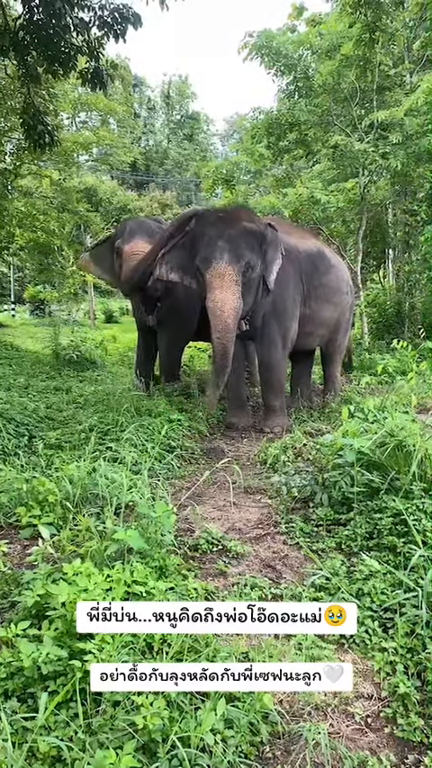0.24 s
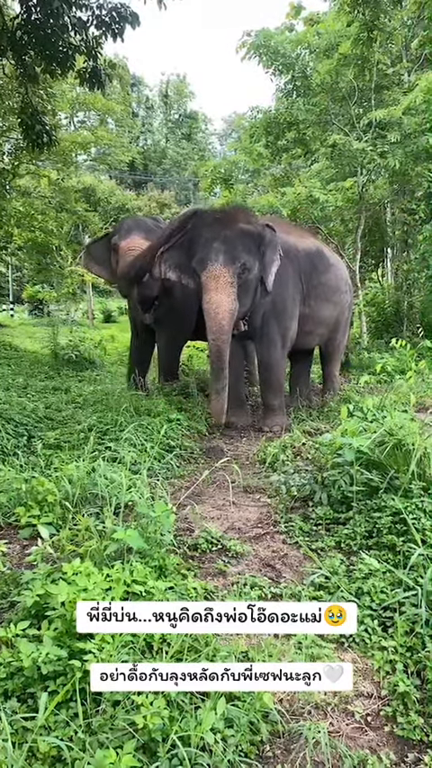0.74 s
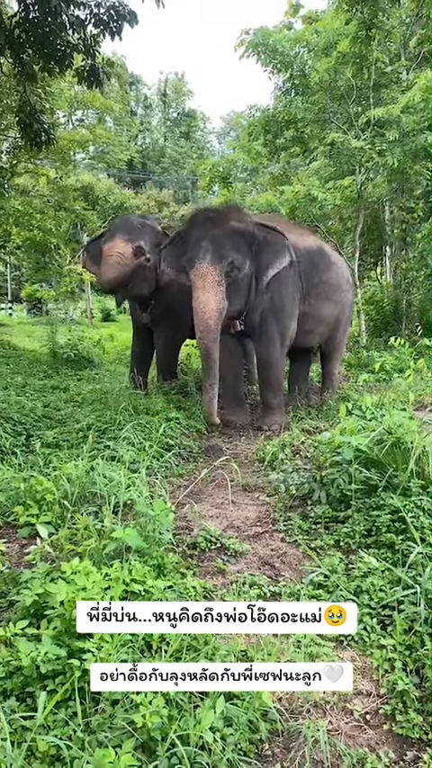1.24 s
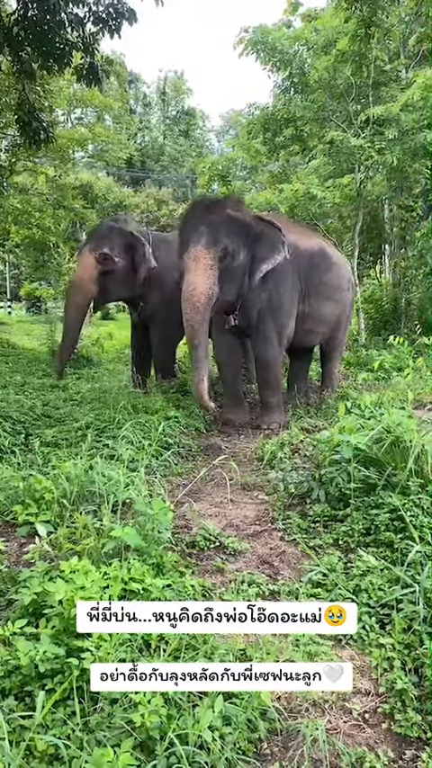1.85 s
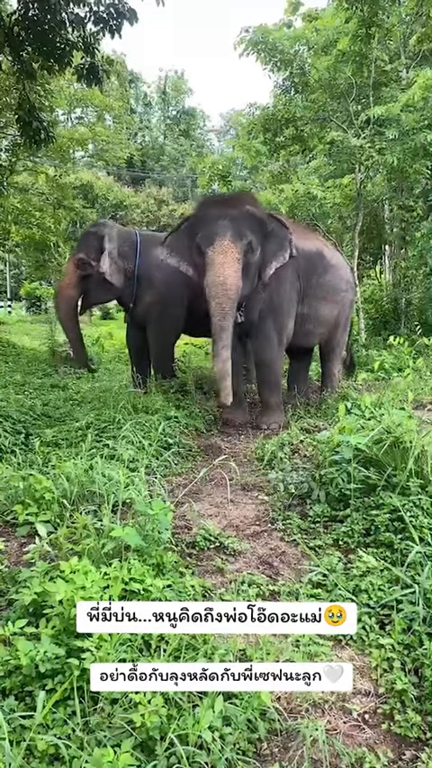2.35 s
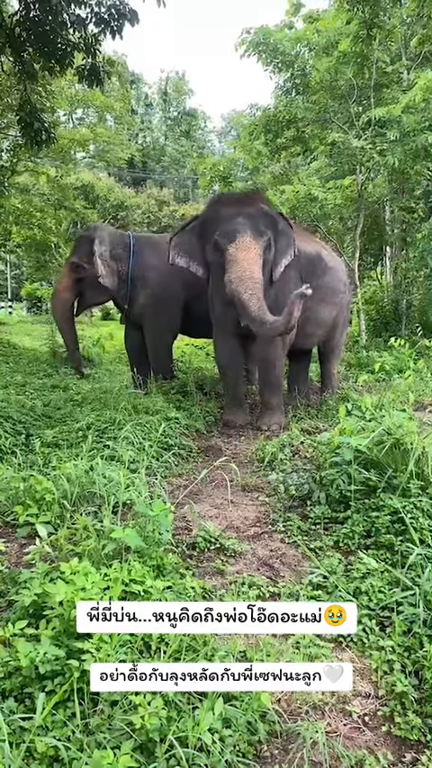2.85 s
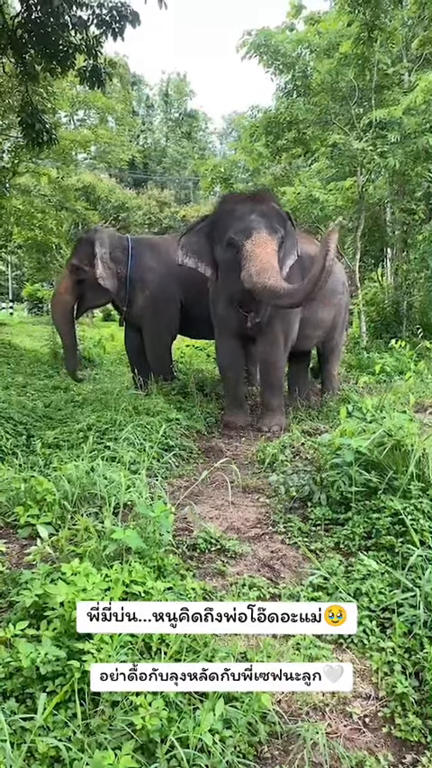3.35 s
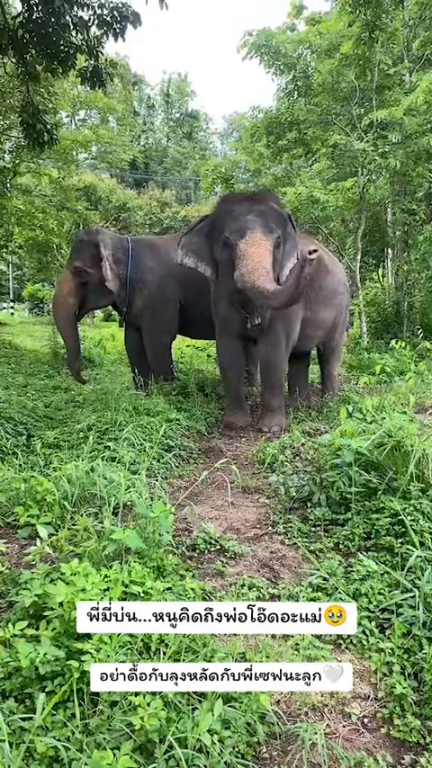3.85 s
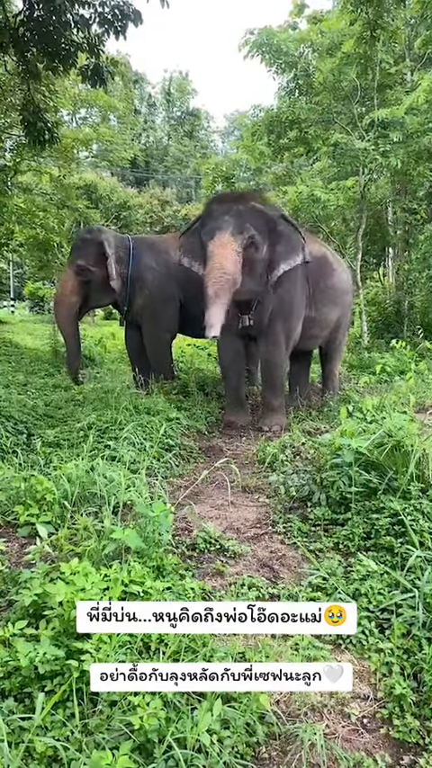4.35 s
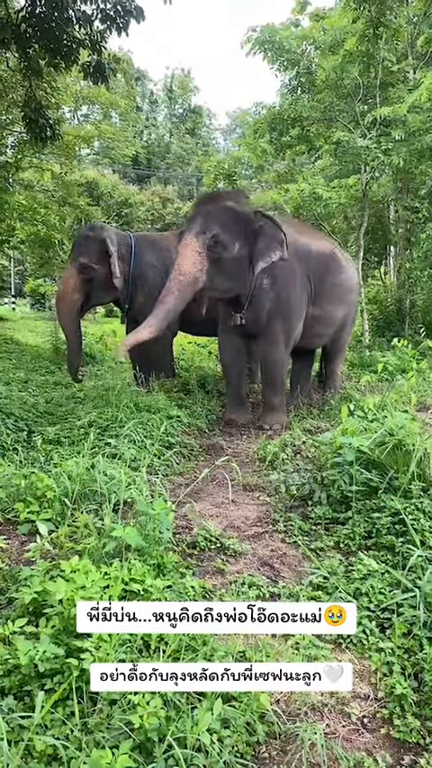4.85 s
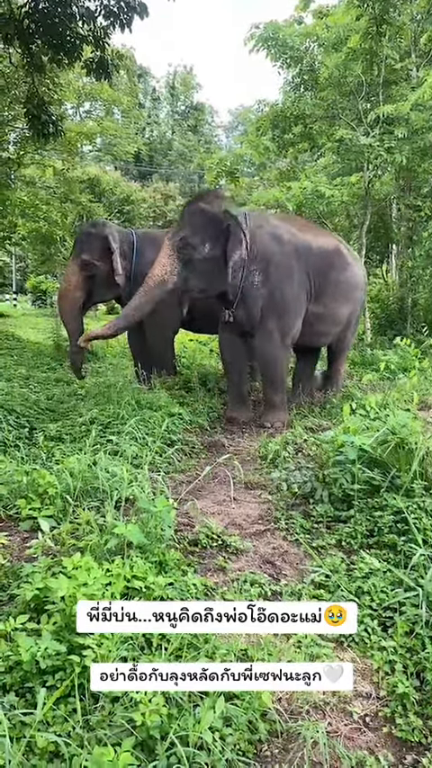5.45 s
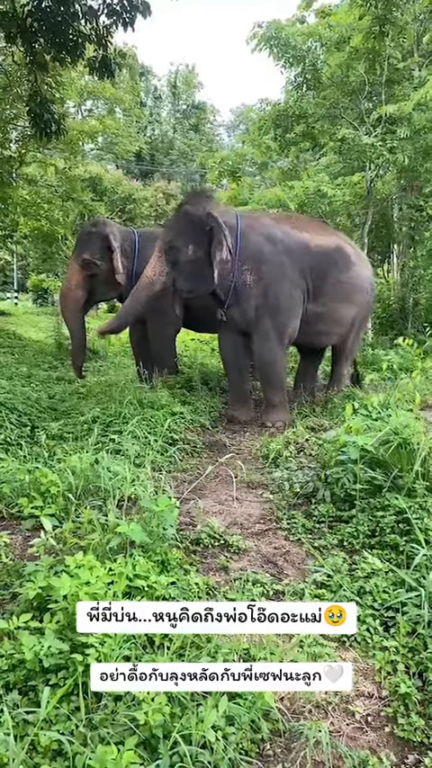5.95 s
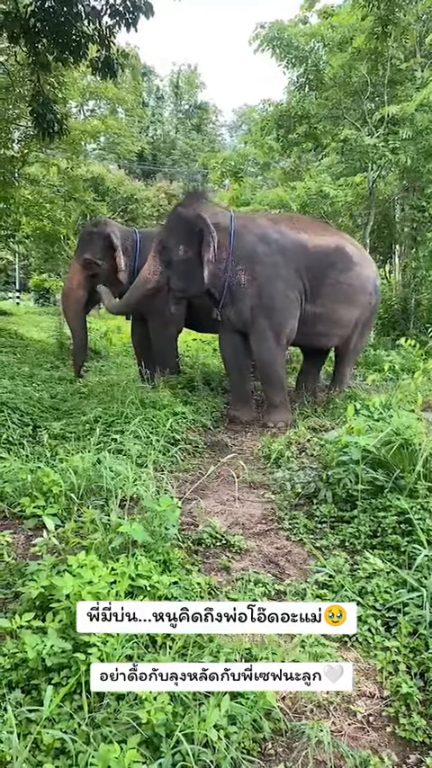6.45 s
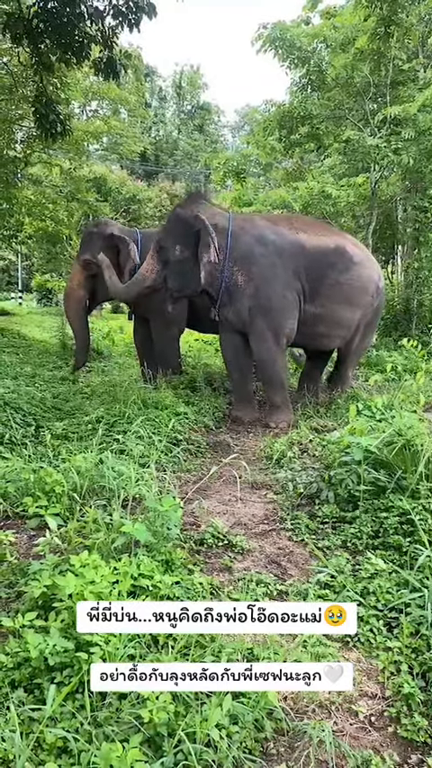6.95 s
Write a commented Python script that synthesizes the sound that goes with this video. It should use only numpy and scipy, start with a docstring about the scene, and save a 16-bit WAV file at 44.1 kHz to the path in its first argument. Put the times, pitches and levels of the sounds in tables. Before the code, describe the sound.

The sound opens in the middle of an elephant's deep rumble, about 24 throat pulses per second, booming near 100 Hz with a faint breathy rasp. It holds steady, easing slightly around 0.9 s, then weakens from 1.2 s, its last pulses slowing until it stops at 1.4 s. A soft, low, fluttering blow of air peaks near 1.55 s and fades. Leaves scrape and twigs crack between 0.4 and 0.9 s, with a thuddy snap at 0.6. A woody, ringing snap comes at 1.9, smaller ones at 2.5 and 6.1, with barely audible foot scuffs at 2.6 and 6.1. Birds chirp sparsely; a harsh, quick warble stands out at 4.0-4.7, an upward flick at 5.0, then faint even pips from 5.4, falling chirps, and flicks at 6.6 and 7.05. A steady high hiss, airy foliage and faint distant engine drone last throughout, with gentle tree echo.

```python
"""Elephant rumble in a forest clearing

An elephant ends a deep, steady rumble (slaps ringing a throat) and blows out its remaining air (noise).
Undergrowth rustles (grainy noise), feet shift (low noise), twigs snap (bursts and decaying sines).
Birds warble and chirp in the trees, among thin faint tones (gliding or held sines).
A high hiss (banded noise) lies all around, over the low drone of a far engine (wavering sines and noise)."""
import sys
import numpy as np
from scipy import signal
from scipy.fft import rfft, irfft, next_fast_len
from scipy.io import wavfile
from scipy.ndimage import uniform_filter1d, map_coordinates

SR = 44100
rng = np.random.default_rng(int(sys.argv[2]) if len(sys.argv) > 2 else 0)


def to_wav(s):
    """Save 16-bit WAV."""
    ch = np.atleast_2d(s).T  # columns
    pcm = np.round(np.clip(ch, -1, 1) * 32767)  # PCM
    wavfile.write(sys.argv[1], SR, pcm.astype(np.int16))


N = 317520

# end of the call; start and speed of its release
STOP_AT_S, RELEASE_AT_S, RELEASE_DB_PER_S = 1.39, 1.174, 69


def amp(db):
    """Decibels to gain."""
    return 10 ** (np.asarray(db) / 20)


def unit(x):
    """Scaled to rms 1."""
    return x / np.sqrt(np.mean(x ** 2) + 1e-20)


def along(points, hz):
    """(Hz, value) points interpolated on a log frequency axis."""
    f, v = np.transpose(points)
    return np.interp(np.log(hz + 1), np.log(f + 1), v)


def wobble(knots_per_s):
    """A smooth random curve through normally distributed knots."""
    knots = rng.standard_normal(size=4096)
    at = np.arange(0, N, 16)
    return np.interp(np.arange(N), at, map_coordinates(knots, [at * knots_per_s / SR], mode="wrap"))


def filtered(x, response):
    """x times a complex response of frequency."""
    m = next_fast_len(N + SR // 2)
    return irfft(rfft(x, m) * response(np.fft.rfftfreq(m, 1 / SR)), m)[..., :N]


def resonance(f, hz, width_hz):
    """Response of one damped resonance."""
    return 1j * f * width_hz / (hz * hz - f * f + 1j * f * width_hz)


def add(track, start_s, sound):
    """Mix a sound in at its start time."""
    part = track[max(0, round(start_s * SR)):][:len(sound)]
    part += sound[:len(part)]


def sine(hz, t, phase=0):
    """A sine of rms 1."""
    return np.sqrt(2) * np.sin(2 * np.pi * hz * t + phase)


def swell(peak_s, rise_s, fall_s):
    """Gain that grows exponentially to 1 at its peak and dies away again."""
    t = np.arange(N) / SR - peak_s
    return np.exp(np.minimum(t / rise_s, -t / fall_s))


def bump(peak_s, half_width_s):
    """A smooth hump of height 1."""
    return np.exp(-((np.arange(N) / SR - peak_s) / half_width_s) ** 2)


def rush(spectrum, patchy_db):
    """Diffuse stereo noise of rms 1 with patches of random gain over time and frequency."""
    # pitch_hz, left_right_likeness
    likeness = [(60, 1), (120, 1), (220, 0.88), (430, 0.036), (820, -0.18), (1580, 0.7), (3040, 0.65),
                (5860, 0.82), (11300, 0.39)]
    z = signal.stft(rng.standard_normal((2, N)), nperseg=512)[2]
    patches = uniform_filter1d(rng.standard_normal(z.shape[1:]), size=5, axis=0)
    patches = uniform_filter1d(patches, size=16, axis=1)
    pair = signal.istft(z * amp(patchy_db * unit(patches)), nperseg=512)[1][:, :N]

    def mid_side(hz):
        angle = np.arccos(np.clip(along(likeness, hz), -1, 1)) / 2
        return amp(along(spectrum, hz)) * [np.cos(angle), np.sin(angle)]

    mid, side = filtered(pair, mid_side)
    return unit(np.array([mid + side, mid - side]))


def ringing(spectrum):
    """Causal impulse response of a body of this (Hz, dB) colour, minimum phase by cepstral folding."""
    cepstrum = irfft(np.log(amp(along(spectrum, np.fft.rfftfreq(SR, 1 / SR)))), SR)
    cepstrum[1:SR // 2] *= 2
    cepstrum[SR // 2 + 1:] = 0
    return irfft(np.exp(rfft(cepstrum)), SR)[:SR // 2]


def rasp(cycles, fleck_db):
    """A puff of air in every cycle rings the mouth, whose resonances bend with each puff and sink as it closes."""
    # pitch_hz, width_hz, level_db (relative), change_db_per_s
    mouth = [(300.3, 220, -3, -3.5), (561, 140, -3.5, -7), (763, 82, 1, -8), (1183, 34, -1.5, -7),
             (2650, 540, -8.5, -5)]
    rasp_db = -75.5
    puff_lead_cycles, puff_sharpness = .15, 1.25  # puffs come just before the slaps
    sag_per_s2, bend = .06, .04  # shares of the resonance pitch
    t = np.arange(N) / SR
    turn = 2 * np.pi * (cycles + puff_lead_cycles)
    puffs = np.exp(puff_sharpness * np.cos(turn))
    bent_s = np.cumsum(1 - sag_per_s2 * t ** 2 + bend * np.sin(turn)) / SR
    out = np.zeros(N)
    for hz, width_hz, db, db_per_s in mouth:
        air = puffs * (rng.standard_normal(N) + 1j * rng.standard_normal(N))
        ring = signal.sosfilt(signal.butter(2, width_hz / 2, fs=SR, output="sos"), air)
        tone = unit(np.real(ring * np.exp(2j * np.pi * hz * bent_s)))
        out += tone * amp(db + db_per_s * t + fleck_db * wobble(24.2))
    return amp(rasp_db) * out * np.clip((STOP_AT_S - t) / .02, 0, 1)


def rumble(first_slap_s, scatter_db, jitter_s):
    """Vocal folds slap shut and each slap booms in the throat; the last slaps come later and weaker."""
    # slap rate, sagging as the air runs out: time_s, pitch_hz
    pitch = [(0, 24.5), (.25, 24.2), (.85, 24.35), (1.0, 24.65), (1.21, 24.6), (1.29, 22.5), (1.33, 17),
             (1.4, 16)]
    # colour of the throat: pitch_hz, level_db (relative)
    throat = [(12, -72.5), (24, -38), (49, -13.5), (73, -14), (88, -9), (97.5, 1), (107, -0.5),
              (122, -12.5), (146, -28), (171, -19.5), (195, -29), (222, -41.5), (260, -54), (500, -83)]
    rumble_db = -42  # rms of the first second, before the easing
    ease_at_s, ease_db, ease_half_width_s = 0.86, -1.5, 0.15  # effort eases before the last push
    slack_db_per_s, slack_hold_s = 700, .018  # extra damping at full slackness, delay after a slap
    t = np.arange(-SR // 2, N) / SR  # the call is already under way
    cycles = np.cumsum(np.interp(t, *np.transpose(pitch))) / SR
    cycles = cycles - np.interp(first_slap_s, t, cycles)
    slap_cycles = np.arange(np.ceil(cycles[0]), np.interp(STOP_AT_S, t, cycles))
    times = np.interp(slap_cycles, cycles, t)
    slaps = np.zeros(len(t))
    for s, (late, hard) in zip(times, rng.standard_normal((len(times), 2))):
        slap_db = scatter_db * hard - RELEASE_DB_PER_S * max(s - RELEASE_AT_S, 0)
        add(slaps, s - t[0] + jitter_s * late, [amp(slap_db)])
    boom = signal.fftconvolve(slaps, ringing(throat))[:len(t)][-N:]
    # a slack throat stops ringing soon after each slap
    t = t[-N:]
    slack = np.clip((t - RELEASE_AT_S) / (STOP_AT_S - RELEASE_AT_S), 0, 1) ** 2
    since_s = t - times[np.searchsorted(times, t) - 1]
    damping = amp(-slack_db_per_s * slack * np.maximum(since_s - slack_hold_s, 0))
    boom = boom * uniform_filter1d(damping, size=300)
    effort = amp(rumble_db + ease_db * bump(ease_at_s, ease_half_width_s))
    return boom / np.std(boom[:SR]) * effort + rasp(cycles[-N:], fleck_db=2.0)


def engine(drone_db, waver_db, drift_rad, swell_db):
    """Far engine lines waver on their way through the forest, over a dull noise drone."""
    # engine lines: pitch_hz, level_db (relative)
    hum = [(29.8, -20), (45.5, -10.5), (59.5, 0.5), (89.5, -11.5), (119, -17.5), (130, -7.5),
           (135.5, -11.5)]
    # drone colour: pitch_hz, level_db (relative)
    drone = [(15, -35), (28, -13.5), (36, -16), (47, 0), (62, 2), (80, -2), (102, -4.5), (135, -0.5),
             (165, -13), (220, -16.5), (330, -34), (600, -56.5)]
    engine_db = -68.5
    t = np.arange(N) / SR
    lines = sum(amp(db + waver_db * wobble(3.7)) * sine(hz, t, drift_rad * wobble(3.012)) for hz, db in hum)
    return amp(engine_db + swell_db * wobble(2.52)) * (lines + amp(drone_db) * rush(drone, patchy_db=0.0))


def forest(air_db, waver_db):
    """Soft noise of air in the foliage, and a nearly steady high hiss in two bands."""
    # air colour: pitch_hz, level_db (relative)
    air_colour = [(100, 7), (300, -2.5), (450, -3.5), (750, -1.5), (1100, 0), (1800, -4), (2400, -2),
                  (3200, -1.5), (3800, -7), (6000, -10), (11500, -51.5), (15500, -45)]
    # hiss colour: pitch_hz, level_db (relative)
    hiss_colour = [(3300, -21.5), (4500, 0), (5000, -2.5), (5450, 3), (5900, -7.5), (6300, -24.5),
                   (7400, -28.5), (8400, -7), (9900, -5), (10300, -9), (11200, -12.5), (12300, -26)]
    # hiss level changes: peak_s, change_db, half_width_s
    hiss_swells = [(3.75, 2.4, 0.36), (4.35, -0.1, 0.18)]
    hiss_db = -76
    air = amp(air_db) * rush(air_colour, patchy_db=1.8)
    level_db = hiss_db + sum(db * bump(s, half_width_s) for s, db, half_width_s in hiss_swells)
    return air + amp(level_db + waver_db * wobble(5.8)) * rush(hiss_colour, patchy_db=2.2)


def note(length_s, start_hz, middle_hz, end_hz, rough, taper=1, flutter_db=0):
    """One gliding or held tone of rms 1; fast random pitch shake makes it harsh."""
    shake_hz = 210 * rough
    u = np.linspace(0, 1, max(int(length_s * SR), 16))
    glide_hz = np.polyval(np.polyfit([0, .5, 1], [start_hz, middle_hz, end_hz], 2), u)
    shake = map_coordinates(rng.standard_normal(size=256), [u * length_s * 500], mode="wrap")
    flutter = map_coordinates(rng.standard_normal(size=64), [u * length_s * 50], mode="wrap")
    tone = np.sin(2 * np.pi * np.cumsum(glide_hz + shake_hz * shake) / SR)
    return unit(amp(flutter_db * flutter) * tone * np.abs(np.sin(np.pi * u)) ** taper)


def calls_and_tones(pip_hz, pip_length_s, count):
    """Five kinds of call or tone: gliding or held notes, and evenly spaced pips of one pitch."""
    # levels precede the mix gain in scene()
    # thin faint tones, mostly held; at 1.989 s a faint falling tone, the echo of the snap at 1.924 s:
    # start_s, length_s, pitch_hz, glide (share of pitch), level_db
    thin_tones = [(0.025, 0.078, 3410, 0, -75.5), (0.124, 0.063, 3405, 0, -81),
                  (0.199, 0.12, 2650, 0.0071, -78), (0.25, 0.087, 3260, -0.0083, -75),
                  (1.062, 0.057, 2380, 0.03, -77.5), (1.989, 0.11, 1647, -.08, -78),
                  (2.44, 0.074, 2645, 0, -73), (2.46, 0.089, 1570, 0, -82), (2.51, .23, 1409, 0.1, -78),
                  (5.094, .25, 1390, 0.1185, -79), (5.46, 0.18, 3160, 0, -87), (5.52, 0.23, 1696, .07, -83),
                  (5.72, 0.099, 998, -0.0044, -79), (6.8, 0.32, 3150, 0, -83.5)]
    # harsh warbler notes: start_s, length_s, middle_pitch_hz, glide (share of pitch), level_db
    warbles = [(1.431, 0.033, 2510, 0.072, -72), (1.452, 0.045, 2790, 0, -73),
               (2.27, 0.049, 2600, -0.0015, -75.5), (2.373, 0.058, 2710, -0.014, -69),
               (3.96, 0.044, 2750, 0.041, -70), (4.123, 0.059, 2225, 0.053, -69),
               (4.187, 0.019, 2920, -0.0018, -68), (4.314, 0.061, 2693, 0.12, -63),
               (4.363, .04, 2425, -0.068, -60), (4.496, .04, 1595, 0.027, -76.5),
               (4.537, 0.044, 2400, 0.0055, -64), (4.569, 0.034, 1956, -0.095, -72.5),
               (4.6, 0.076, 1737, 0.025, -76)]
    # falling chirps of one shape: start_s, start_pitch_hz, level_db
    chirps = [(1.886, 2780, -70.5), (2.35, 3770, -75), (2.63, 3570, -79), (3.724, 3470, -77),
              (5.225, 3500, -82), (5.3, 3300, -89), (5.765, 3350, -81), (5.96, 3200, -78),
              (6.215, 3520, -78), (6.309, 3520, -77), (6.673, 3500, -74)]
    # upward flicks to one top note: start_s, length_s, start_pitch_hz, level_db
    flicks = [(4.97, 0.027, 3860, -68), (6.612, 0.054, 3400, -69.5), (7.068, 0.072, 3970, -70)]
    warble_arch, warble_rough_per_khz = 0.039, 0.18  # arch as a share of pitch
    flick_top_hz, flick_bend = 4870, 0.27  # share of the climb done at half time
    chirp_s, chirp_fall = 0.07, 0.27  # fall as a share of pitch
    pips_from_s, pip_period_s = 5.375, 0.222  # a far bird's even pace
    pip_db, pip_growth_db, pip_scatter_db = -77, 0.5, 1.3  # growth per pip
    out = np.zeros(N)
    for s, length_s, hz, glide, db in warbles:
        ends_hz, step_hz = hz * (1 - warble_arch), hz * glide / 2
        rough = warble_rough_per_khz * hz / 10 ** 3
        add(out, s, amp(db) * note(length_s, ends_hz - step_hz, hz, ends_hz + step_hz, rough))
    for s, length_s, hz, db in flicks:
        middle_hz = hz + flick_bend * (flick_top_hz - hz)
        add(out, s, amp(db) * note(length_s, hz, middle_hz, flick_top_hz, rough=0.15))
    for s, hz, db in chirps:
        middle_hz, end_hz = hz * (1 - chirp_fall / 2), hz * (1 - chirp_fall)
        add(out, s, amp(db) * note(chirp_s, hz, middle_hz, end_hz, rough=0.76))
    for s, length_s, hz, glide, db in thin_tones:
        step_hz = hz * glide / 2
        tone = note(length_s, hz - step_hz, hz, hz + step_hz, rough=0.17, taper=.5, flutter_db=4)
        add(out, s, amp(db) * tone)
    for k in range(count):
        db = pip_db + k * pip_growth_db + pip_scatter_db * rng.standard_normal()
        pip = note(pip_length_s, pip_hz, pip_hz, pip_hz, rough=0.27)
        add(out, pips_from_s + k * pip_period_s, amp(db) * pip)
    return out


def far_birds(chatter_db, pitch_hz, sweep, count):
    """Many faint chirps at random times, sweeping up or down, from deep in the trees."""
    out = np.zeros(N)
    for when, length, pitch, slope, size in rng.random((count, 5)):
        hz = pitch_hz * (.75 + .5 * pitch)
        step_hz = hz * sweep * (2 * slope - 1)
        chirp = note(.04 + 0.063 * length, hz + step_hz, hz, hz - step_hz, rough=.45)
        add(out, when * N / SR, amp(chatter_db - 2.2 * size) * chirp)
    return out


def undergrowth(grain_db, crackles_per_s, crackle_db, stalk_db):
    """Leaves scrape and crackle, coloured by the stalks each swish bends; dry blades brush and sizzle."""
    # trampled swishes: peak_s, level_db, rise_s, stalk_resonance_hz
    swishes = [(.38, -68, 0.2, 1020), (.495, -69, 0.024, 2680), (.54, -76, 0.016, 900),
               (.61, -67, 0.0075, 700), (.645, -72.5, 0.0087, 2720), (.78, -73.5, 0.011, 1300),
               (.83, -69.5, 0.024, 1430)]
    # leaf colour: pitch_hz, level_db (relative)
    leaf_colour = [(150, -16), (350, 4), (900, 2.5), (1400, 0.5), (2000, -1), (2700, -1), (4000, -4.5),
                   (5700, -6.5), (7300, -36), (9500, -12), (15000, -33)]
    # dry grass brushes: peak_s, level_db, half_width_s
    sizzles = [(.487, -75.5, .03), (1.09, -80, 0.033)]
    # dry grass colour: pitch_hz, level_db (relative)
    blade_colour = [(2000, -22), (5000, 1), (9500, -4), (12000, 5), (15500, -12)]
    fall_per_rise = 2.44  # ratio of time constants

    def scraping(spectrum):
        return unit(rush(spectrum, patchy_db=2.0) * amp(grain_db * wobble(300)))

    ticks = (rng.random(N) < crackles_per_s / SR) * rng.standard_normal(N)
    crackle = unit(filtered(ticks, lambda f: amp(along(leaf_colour, f))))
    leaves = scraping(leaf_colour) + amp(crackle_db) * crackle
    out = scraping(blade_colour) * sum(amp(db) * bump(s, half_width_s) for s, db, half_width_s in sizzles)
    for s, db, rise_s, hz in swishes:
        coloured = filtered(leaves, lambda f: 1 + amp(stalk_db) * resonance(f, hz, 0.25 * hz))
        out += amp(db) * unit(coloured) * swell(s, rise_s, fall_per_rise * rise_s)
    return out


def twigs(crack_db, crack_t60_s, thud_t60_s, thud_rise_s):
    """Each snap is a broad noise crack and a short ring of the wood, over a thud of the ground."""
    # start_s, level_db, ring_hz, ring_t60_s, crack_hz, thud_db (relative)
    snaps = [(.495, -65, 5170, .015, 5500, -24), (0.509, -64, 2600, .05, 2600, -20),
             (0.532, -67, 3000, .012, 4000, -20), (0.557, -75, 1290, .012, 1500, -10),
             (.613, -60.5, 2750, 0.018, 3200, 15.5), (1.924, -62, 1707, 0.08, 1460, -12),
             (2.467, -66, 2900, .015, 3100, -25), (6.124, -68, 1350, 0.017, 1000, -2)]
    thud_hz = 270
    out, t = np.zeros(N), np.arange(SR // 5) / SR
    f = np.fft.rfftfreq(len(t), 1 / SR)
    for s, db, hz, t60_s, crack_hz, thud_db in snaps:
        crack_response = resonance(f, crack_hz, 0.98 * crack_hz) ** 2
        fibres = unit(irfft(rfft(rng.standard_normal(len(t))) * crack_response, len(t)))
        crack = fibres * amp(crack_db - 60 * t / crack_t60_s)
        ring = sine(hz, t) * amp(-60 * t / t60_s)
        thud = sine(thud_hz, t) * amp(thud_db - 60 * t / thud_t60_s)
        thud = thud * (1 - np.exp(-(t / thud_rise_s) ** 2))
        add(out, s, amp(db) * (crack + ring + thud))
    return out


def blow(flutter_db):
    """The elephant's remaining air flutters out through its trunk as coloured noise."""
    # trunk colour: pitch_hz, level_db (relative)
    trunk = [(120, -2), (230, 2), (350, -0.5), (520, 1.5), (700, -2), (950, -11), (2500, -23), (6000, -43)]
    blow_db, peak_s, rise_s, fall_s = -65.5, 1.562, 0.16, 0.27
    level = amp(blow_db + flutter_db * wobble(45.14))
    return rush(trunk, patchy_db=0.5) * swell(peak_s, rise_s, fall_s) * level


def feet():
    """Heavy feet shift softly on the earth: dull scuffs of noise through a low resonance."""
    # peak_s, level_db, rise_s
    shuffles = [(2.63, -80, .04), (6.1, -81.5, 0.2)]
    earth_hz, width_hz, fall_s = 280, 146, 0.31
    earth = filtered(rng.standard_normal(N), lambda f: resonance(f, earth_hz, width_hz) ** 2)
    return unit(earth) * sum(amp(db) * swell(s, rise_s, fall_s) for s, db, rise_s in shuffles)


def echo(x):
    """Trunks and crowns scatter sound back as a decaying noise tail, different on each side."""
    # pitch_hz, t60_s
    trees = [(200, 0.72), (2000, 0.76), (8000, 0.28)]
    hz, t, z = signal.stft(rng.standard_normal((2, SR // 2)), SR, nperseg=256)
    tail = signal.istft(z * amp(-60 * t / along(trees, hz)[:, None]), SR, nperseg=256)[1]
    return signal.fftconvolve(x[None], tail / np.linalg.norm(tail[0]), axes=1)[:, :N]


def scene():
    """The elephant near the middle, with birds and the forest around it."""
    elephant = rumble(first_slap_s=0.02645, scatter_db=0.56, jitter_s=0.00023)
    elephant = elephant + blow(flutter_db=1.3) * amp(0.38 * np.array([[1], [-1]]))  # left, right
    song = calls_and_tones(pip_hz=2330, pip_length_s=0.043, count=9)
    song = song + far_birds(chatter_db=-80.5, pitch_hz=2887, sweep=0.1074, count=54)
    snaps = twigs(crack_db=-2, crack_t60_s=0.028, thud_t60_s=0.03, thud_rise_s=0.0039)
    around = engine(drone_db=1, waver_db=2, drift_rad=0.66, swell_db=-0.06)
    around = around + forest(air_db=-75.5, waver_db=0.27)
    rustle = undergrowth(grain_db=0.9, crackles_per_s=500, crackle_db=-8, stalk_db=-2.5)
    scattered = echo(amp(-11.0) * song + amp(-9) * snaps)
    return elephant + feet() + rustle + amp(-5.5) * song + snaps + scattered + around


def record(dry):
    """The two microphones differ a little in colour; nothing is kept above the band limit."""
    # pitch_hz, left_minus_right_db
    lean = [(60, -1.5), (110, -2.0), (190, -4), (340, -4), (610, -4.5), (1100, 1.5), (1970, -0.5),
            (3520, -0.5), (6300, 0.0), (11300, 0.0)]
    top_hz = 15600
    halves = np.array([[.5], [-.5]])  # each side takes half the difference
    return filtered(dry, lambda hz: amp(along(lean, hz) * halves) * (hz < top_hz))


dry = scene()
out = record(dry)
to_wav(out)
```